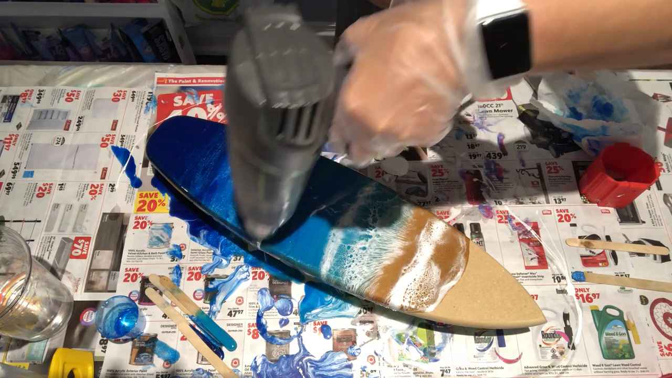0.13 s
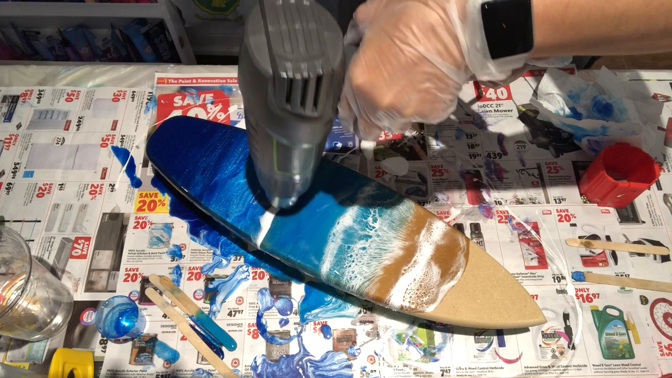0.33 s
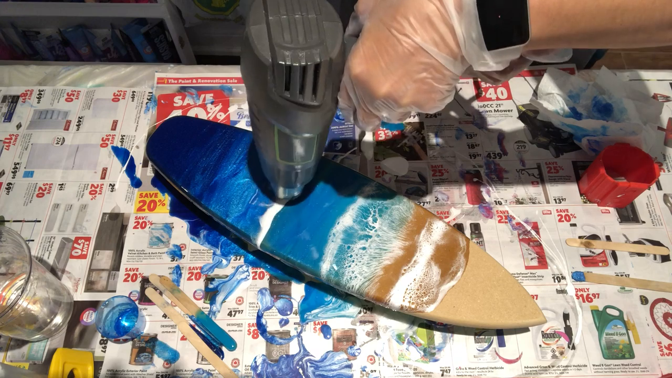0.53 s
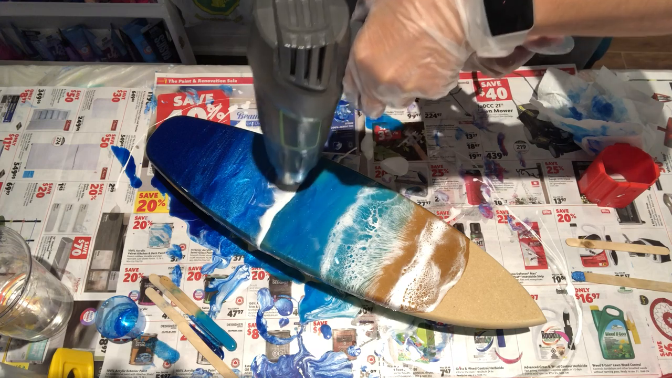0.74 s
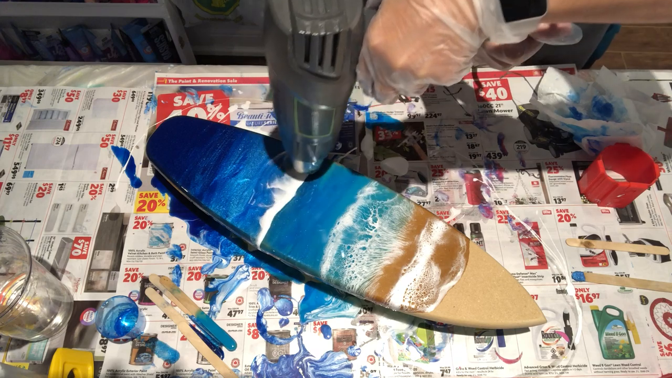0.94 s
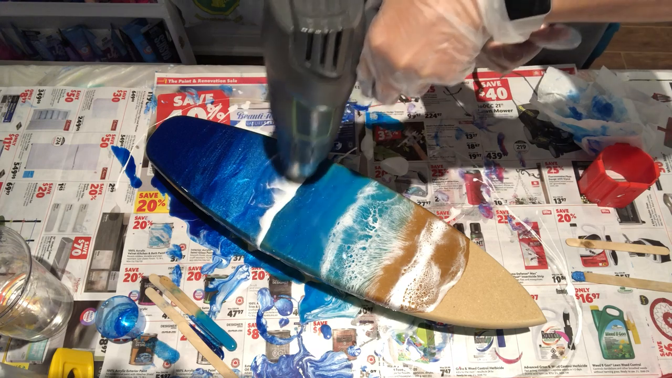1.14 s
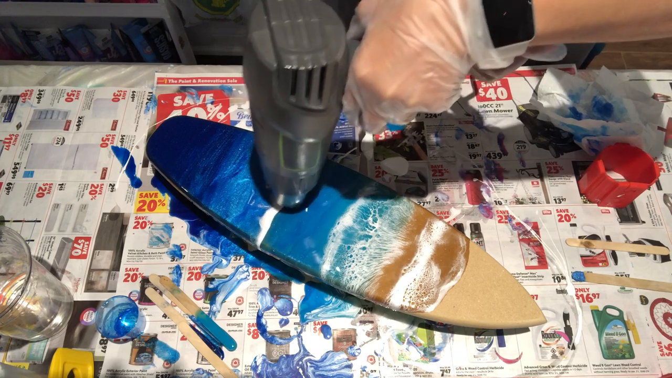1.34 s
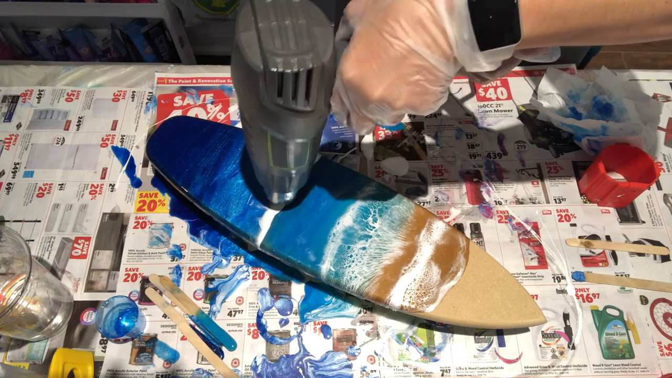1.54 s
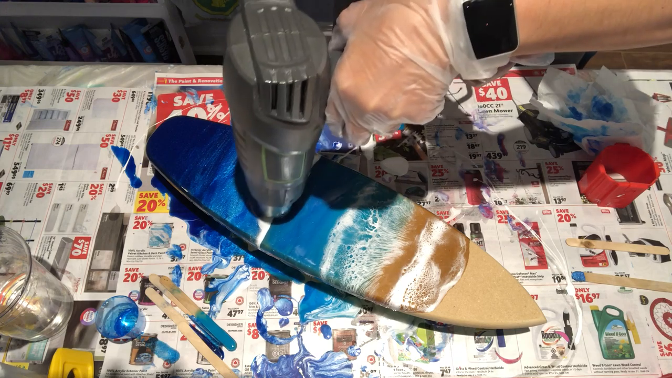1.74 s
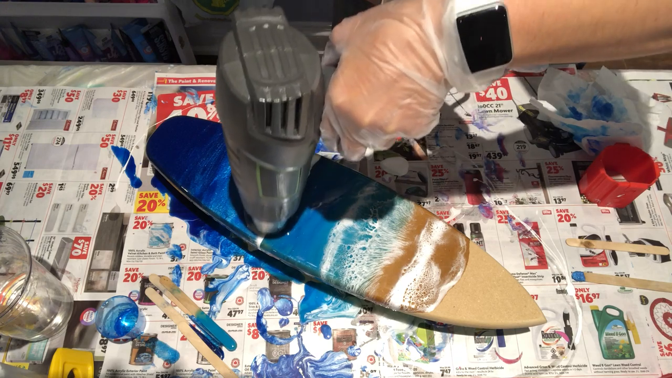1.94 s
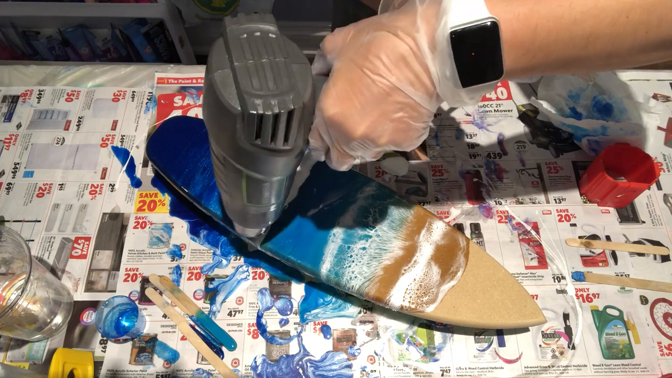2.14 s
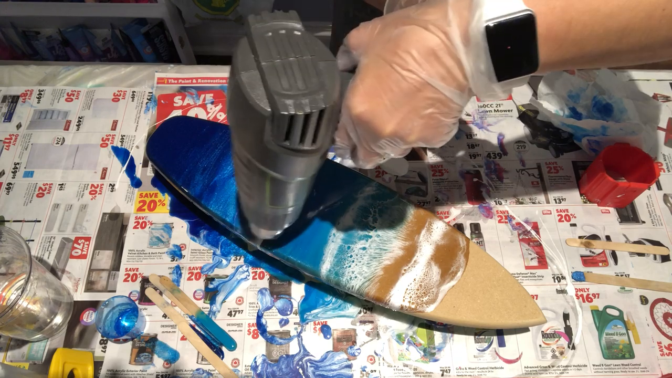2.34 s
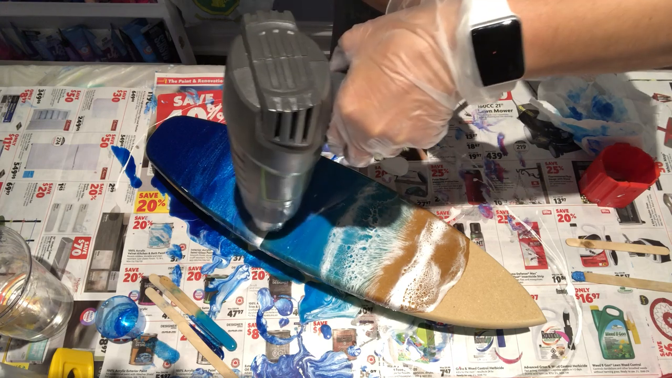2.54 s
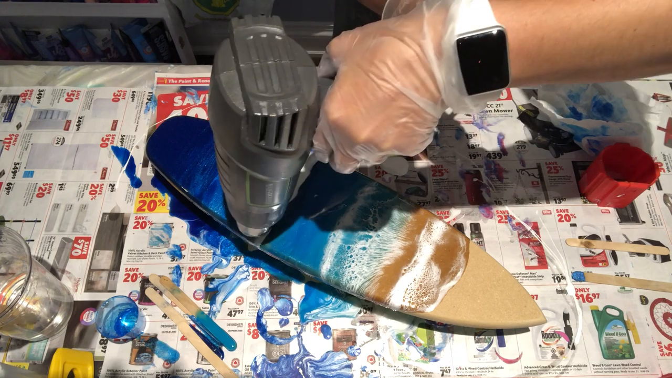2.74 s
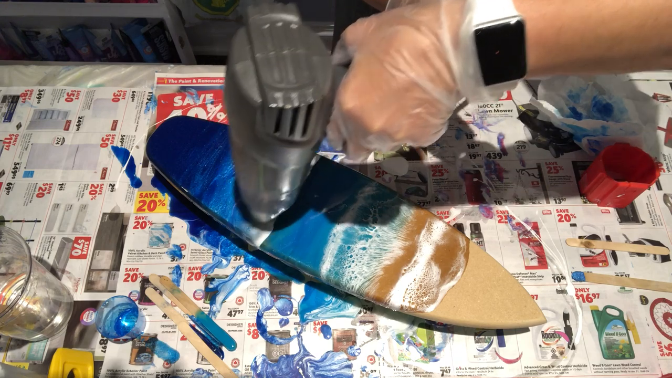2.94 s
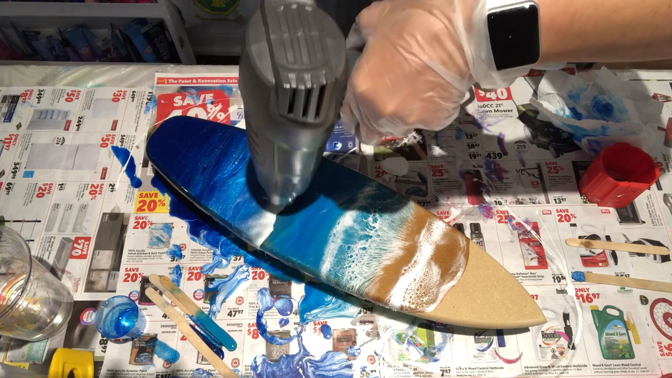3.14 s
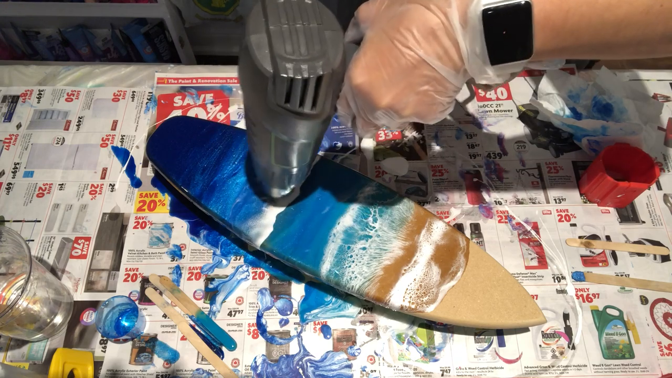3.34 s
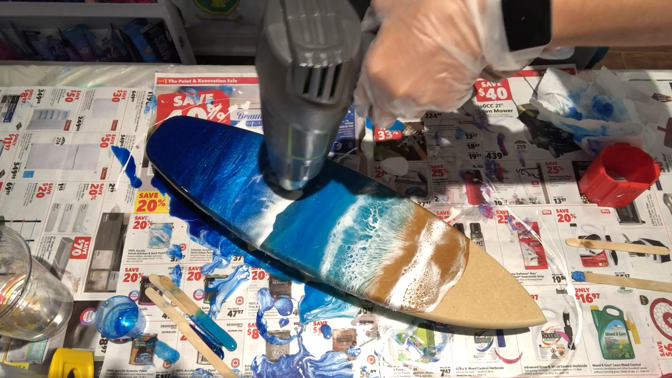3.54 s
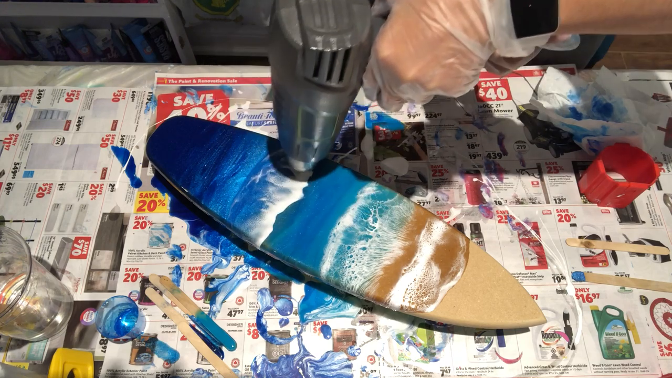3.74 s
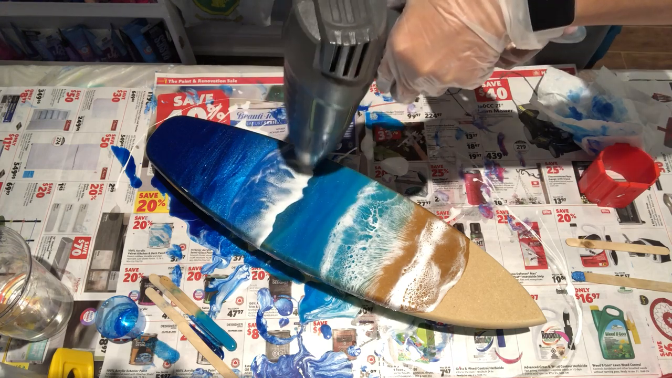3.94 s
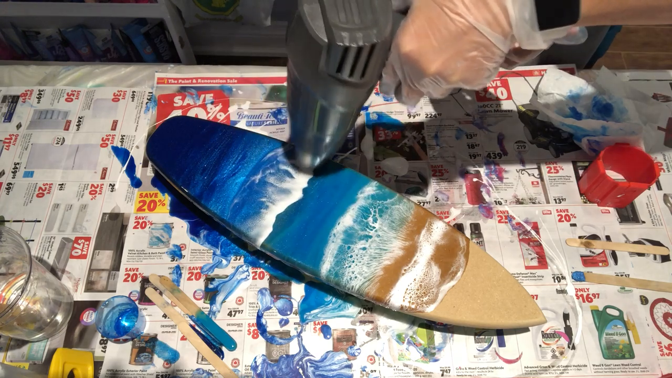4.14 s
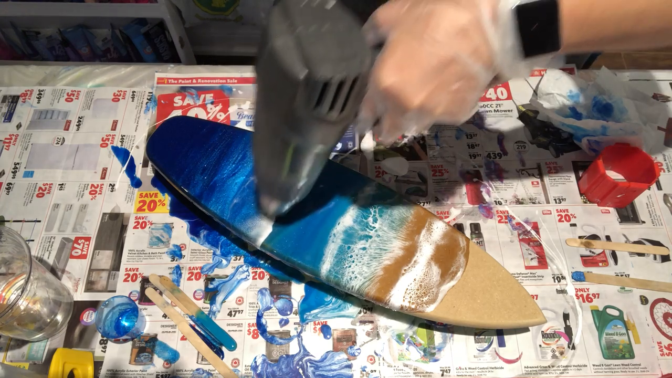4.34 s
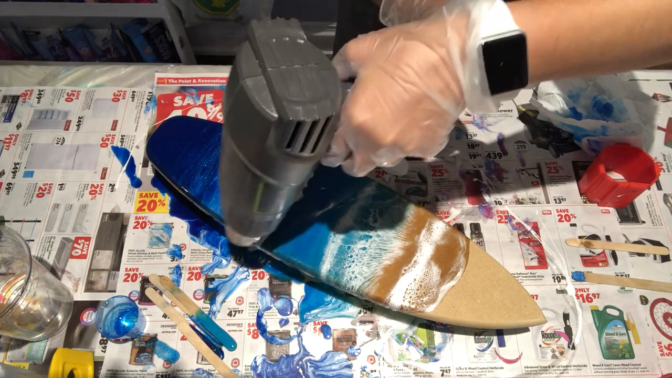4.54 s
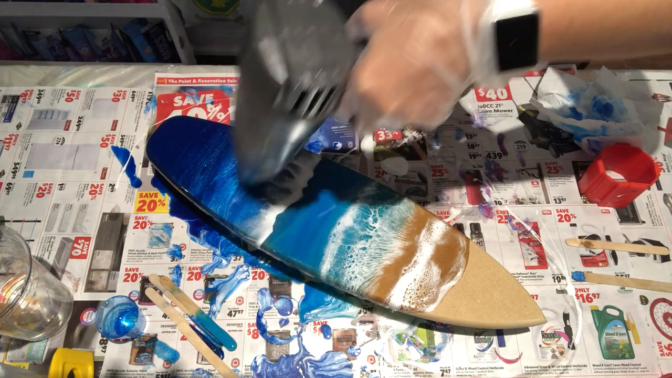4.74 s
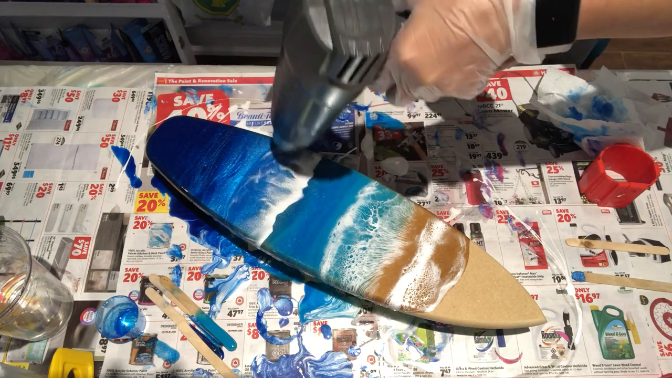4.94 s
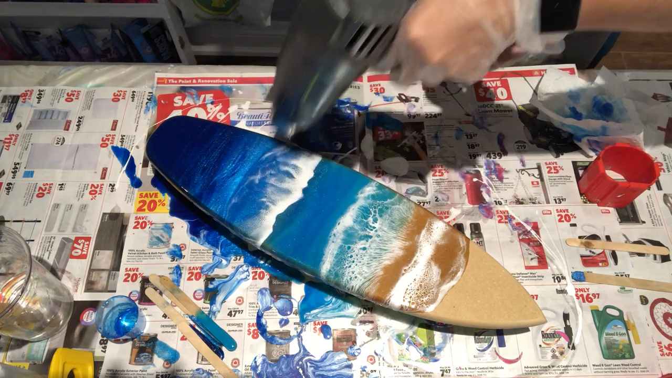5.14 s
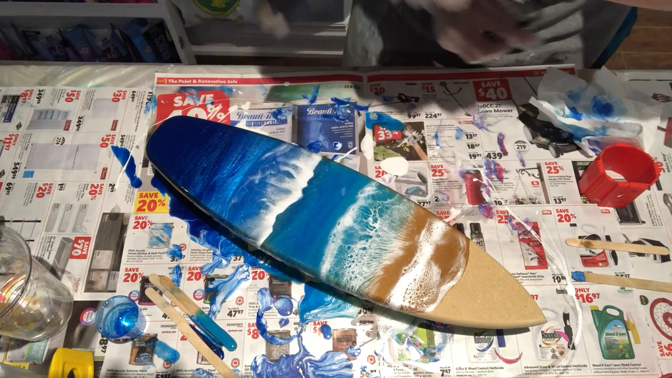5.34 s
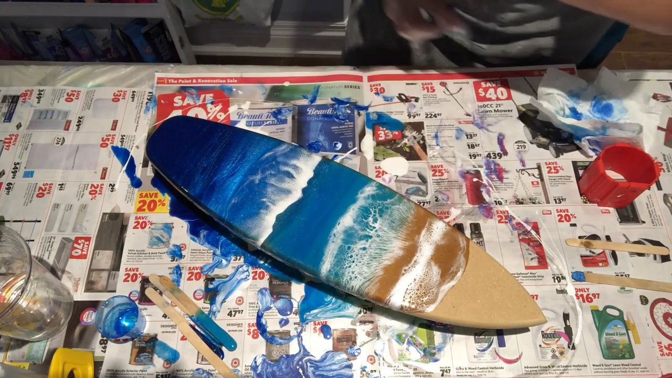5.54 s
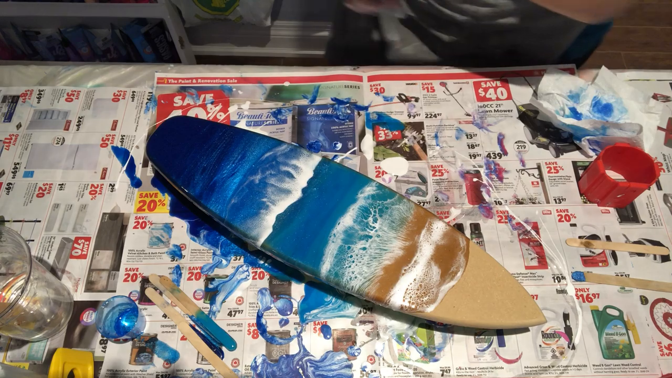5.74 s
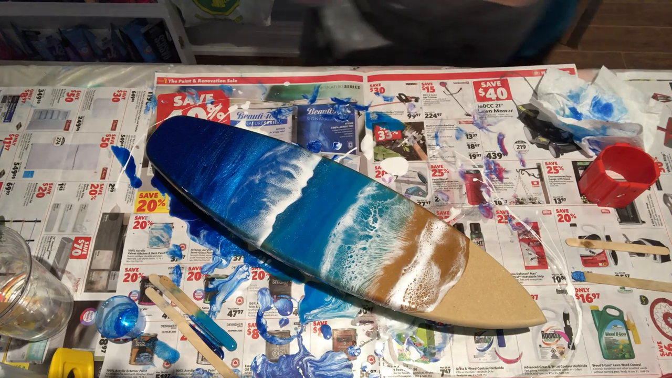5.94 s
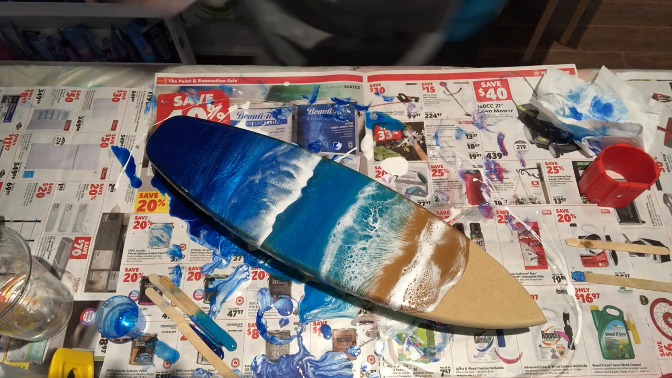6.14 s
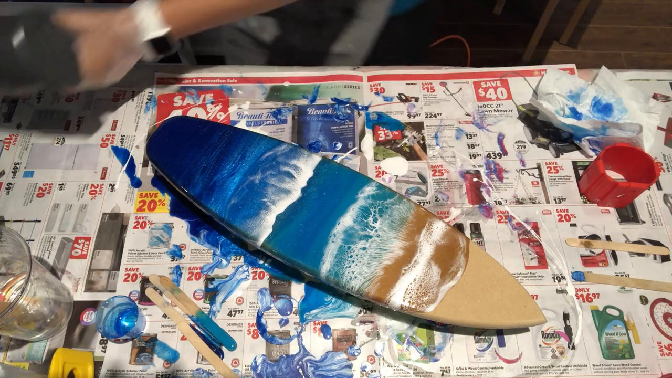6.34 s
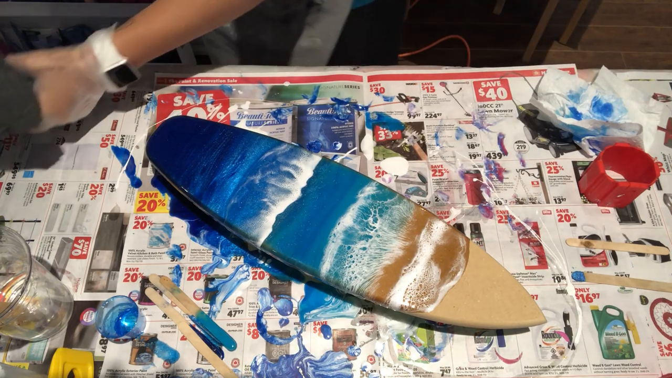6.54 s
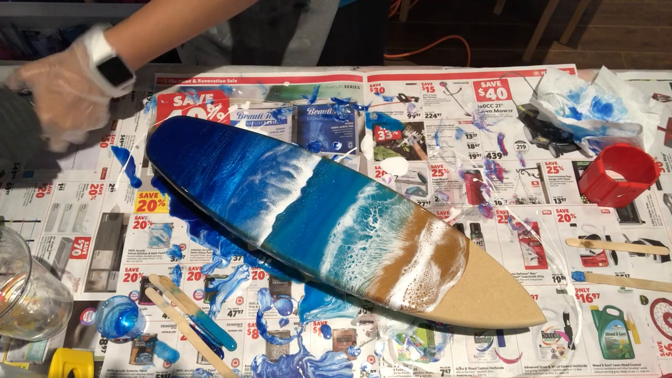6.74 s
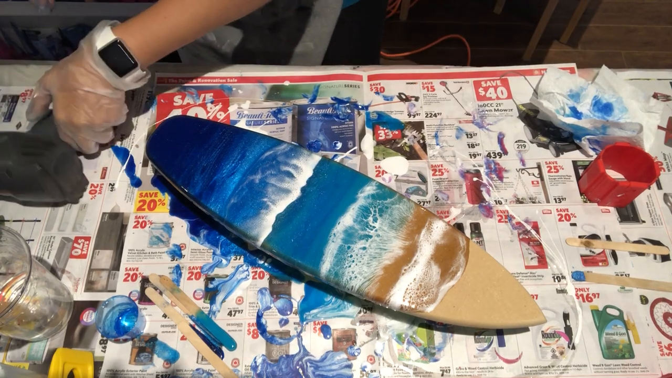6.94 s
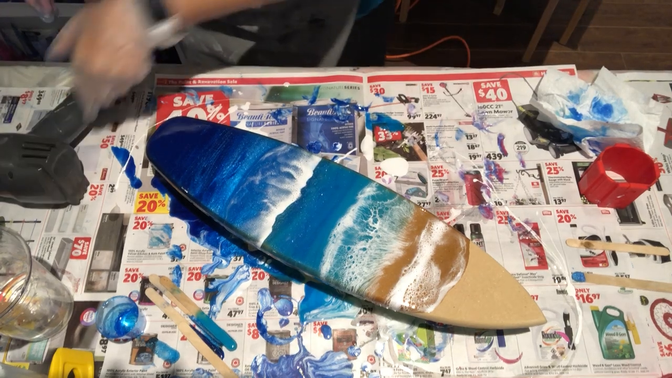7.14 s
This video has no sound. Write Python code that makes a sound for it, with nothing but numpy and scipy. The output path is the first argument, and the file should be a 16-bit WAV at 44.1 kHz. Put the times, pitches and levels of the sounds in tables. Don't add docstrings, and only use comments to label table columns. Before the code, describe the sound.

A handheld hot-air gun roars and whines steadily over a work table, clicks off, winds down in pitch, then is set down with a clattering knock.

```python
import sys
import numpy as np
from scipy import signal
from scipy.fft import rfft, irfft, next_fast_len
from scipy.io import wavfile
from scipy.ndimage import uniform_filter1d, map_coordinates

SR = 44100
rng = np.random.default_rng(int(sys.argv[2]) if len(sys.argv) > 2 else 0)


def magnitude_from_level(level_db):
    exponent = np.asarray(level_db, float) / 20
    return 10 ** exponent


def wrap_up_sound(samples):
    columns = np.atleast_2d(samples).T
    tamed = np.clip(columns, -1, 1)
    steps = np.round(tamed * 32767).astype(np.int16)
    wavfile.write(sys.argv[1], SR, steps)


N = 317079
OFF_S = 5.91


def seconds():
    return np.arange(N) / SR


def in_time(rows):
    s, *columns = np.transpose(rows)
    return [np.interp(seconds(), s, c) for c in columns]


def swell(rows, rise, fall):
    t = seconds()
    levels = []
    for start, db, hold in rows:
        before, after = np.maximum(start - t, 0), np.maximum(t - start - hold, 0)
        levels.append(db - rise * before - fall * after)
    return np.max(levels, axis=0)


def rms_one(x):
    return x / np.sqrt(np.mean(x ** 2) + 1e-20)


def noise():
    return rng.standard_normal(N)


def band(x, low_hz, high_hz):
    return signal.sosfilt(signal.butter(2, [low_hz, high_hz], "band", fs=SR, output="sos"), x)


def narrow_note(breath, hz, width_hz):
    return rms_one(band(breath, hz - width_hz / 2, hz + width_hz / 2))


def drift(rate):
    r = np.exp(-128 * np.pi * rate / SR)
    wander = signal.lfilter([1], [1, -2 * r, r * r], rng.standard_normal(N // 64 + 2001))
    return rms_one(wander[2000:])


def turned_away(t):
    return np.clip((t - 5.07) / 0.71, 0, 1)


def slowing():
    since = np.maximum(seconds() - OFF_S, 0)
    first_sag = 1 - .0657 * (1 - np.exp(-since / .322))
    return np.exp(-since / 0.9005) * first_sag


# t/s, speed/turns per s
ROTOR_SPEED = [(0.0, 234.7), (0.24, 234.1), (0.87, 234.85), (1.3, 234.45), (2.13, 234.7), (2.6, 234.3),
               (4.3, 234.15), (4.46, 234.35), (4.74, 233.65), (5.05, 234.1), (5.42, 233.75), (5.6, 235.0),
               (5.91, 236.4)]


def rotor():
    return np.cumsum(in_time(ROTOR_SPEED)[0] * slowing()) / SR


# t/s, nearness to the work/dB, how far the vents face the listener/dB
HAND_SWEEP = [(0.0, -2, -7), (0.3, 1, -4), (0.55, 1, -3), (0.8, 2, 0), (1.2, 2, -1.5), (1.5, 1.5, 0),
              (2.1, -0.5, -3), (2.75, -1.5, 0), (3.26, 0.5, 3), (3.6, 1.5, 2), (4.0, 0.5, 4),
              (4.3, 2.5, 1.5), (4.55, -2, 5), (4.818, -1, 3), (5.05, 0, 10), (5.3, -4.5, 7.5),
              (5.5, -7.5, 4), (5.9, -9, 4)]
AIR_ZONES_HZ = [300, 760, 960, 1210, 1520, 1920, 2420, 3050, 3840, 4840, 8500]
# change/dB per dB of nearness, per dB of facing, per dB of rotor speed,
# then level/dB once lifted away, level/dB once the brush sparks stop
AIR_FOLLOWS_HAND = [(-0.19, 0.0, 2.1, -3.5, 1.5), (0.32, 0.0, 3, -2, 9), (-0.34, 0.0, 2, -12.5, 1.5),
                    (1.16, 0.0, 2.5, 4.5, -4), (1.26, 0.4, 2, 5, 2.5), (0.1, 0.07, 2, -4, -3.5),
                    (-0.1, -0.05, 3, -4, 3), (0.1, -0.18, 3, 1.5, -1.5), (0.66, -0.14, 3, 4.5, -1),
                    (.5, -0.4, 1.4, 2, -4.5), (0, 0.05, 1.6, 1, -5)]
# f/Hz, level/dB per Hz
AIR_COLOUR = [(50, -101.5), (130, -87.5), (250, -82.5), (480, -81), (650, -86.5), (900, -81.5), (1500, -85),
              (2300, -86), (3300, -92.5), (5000, -92.5), (7000, -99), (14300, -105), (15400, -114),
              (17000, -115)]
# f/Hz, width/Hz, level on top/dB per Hz
BARREL_RESONANCES = [(755.7, 37, -68), (826, 47, -71), (997, 88, -73), (1123, 165, -66), (1380, 260, -80.5),
                     (1803, 310, -79), (1943, 57, -77), (2554, 94, -84), (2883, 195, -78.5),
                     (3826, 510, -84), (4390, 230, -88), (6040, 350, -91)]


def air(turns, shared_db, own_db, quick_db, hiss_db, chop):
    size = next_fast_len(N)
    hz = np.maximum(np.fft.rfftfreq(size, 1 / SR), 1)
    colour_hz, colour_db = np.transpose(AIR_COLOUR)
    power = magnitude_from_level(2 * np.interp(np.log(hz), np.log(colour_hz), colour_db))
    for peak_hz, width_hz, db in BARREL_RESONANCES:
        power += magnitude_from_level(2 * db) / (1 + (2 * (hz - peak_hz) / width_hz) ** 2) ** 1.5
    power /= 1 + (hz / 17600) ** 40
    spectrum = rfft(rng.standard_normal(size)) * np.sqrt(power * SR / 2)

    t, zones = seconds(), np.arange(len(AIR_ZONES_HZ))
    sparks_gone = np.clip((t - OFF_S) / 0.24, 0, 1)
    speed_db = 20 * np.log10(slowing())
    causes = np.array([*in_time(HAND_SWEEP), speed_db, turned_away(t), sparks_gone])
    zone_db = np.array(AIR_FOLLOWS_HAND) @ causes[:, ::64]

    together, out = drift(4.1), np.zeros(N)
    for centre in 30 * 2 ** np.arange(0, 9.4, 1 / 3):
        share = np.cos(np.pi / 2 * np.clip(3 * np.log2(hz / centre), -1, 1)) ** 2
        place = np.interp(np.log(centre), np.log(AIR_ZONES_HZ), zones)
        level = np.interp(zones, place + np.array([-1, 0, 1]), [0, 1, 0]) @ zone_db
        level = level + (shared_db + hiss_db * (centre > 6000)) * together
        level = level + own_db * drift(1.0) + quick_db * drift(1.5)
        gain = np.interp(np.arange(N) / 64, np.arange(len(level)), magnitude_from_level(level))
        piece = irfft(spectrum * share, size)[:N] * gain
        depth = chop * np.clip(np.log2(centre / 3000) / 2, 0, 1)
        out += piece * (1 + depth * (np.cos(2 * np.pi * turns) + 1.2 * np.cos(4 * np.pi * turns)))
    return out


# f/Hz, width/Hz, level/dB,
# change/dB per dB of nearness, change/dB per dB of facing
GAP_RESONANCES = [(1040, 63, -56, 2, -1), (1179.4, 108, -49.5, 0.35, -0.02), (1752, 150, -60, 4.5, .5),
                  (1928, 93, -63, 0.5, 0.2), (2540, 180, -63, 3, 0.6), (4020, 430, -62.5, 1.5, 0.2)]


def gap():
    (near_db, facing_db), breath = in_time(HAND_SWEEP), noise()
    notes = np.zeros(N)
    for hz, width_hz, db, near, facing in GAP_RESONANCES:
        notes += magnitude_from_level(db + near * near_db + facing * facing_db) * narrow_note(breath, hz, width_hz)
    return notes * slowing() ** 2.5


# f/Hz, width/Hz, level/dB
OPEN_RESONANCES = [(817, 88, -9.5), (1212, 170, 0), (1843, 130, -9), (2900, 100, -19), (3930, 130, -22)]
# start t/s, level/dB, hold t/s
OPEN_SINGING = [
    (5.08, -49.5, 0.88),
    (5.3, -41.5, 0.0046),
]


def open_barrel():
    breath = noise()
    notes = sum(magnitude_from_level(db) * narrow_note(breath, hz, width_hz) for hz, width_hz, db in OPEN_RESONANCES)
    return magnitude_from_level(swell(OPEN_SINGING, rise=49, fall=44)) * notes


# multiple, t/s, level/dB
VENT_BEAMS = [(6, 2.5, -6), (6, 5.2, 4), (11, 1.0, 4), (11, 2.8, -4), (11, 3.75, 4), (12, 4.75, -4),
              (15, 5.4, -6), (20, 1.7, -5), (20, 2.7, -6), (20, 4.25, 4), (20, 5.15, 7), (26, .75, -8),
              (28, 1.2, 3), (28, 4.25, -7), (29, 3.8, -9), (29, 4.6, -9), (29, 2.9, 3), (33, 1.0, -5),
              (33, 2.8, 4), (33, 5.0, -5), (34, 2.75, 4), (34, 4.5, -5), (35, 1.0, -5), (35, 2.8, 3),
              (35, 3.75, -5), (35, 5.05, 6), (35, 4.45, 4), (40, 3.95, 5), (40, 5.2, 4), (31, 5.0, 6),
              (50, 4.8, -9), (50, 5.5, -8), (59, 5.4, -5), (60, 2.25, 3), (60, 3.75, 4), (62, .75, -3),
              (62, 3.2, 4), (63, 3.25, 5), (63, 4.6, -4), (27, 5.7, 4), (28, 5.7, 6), (29, 5.55, 7),
              (60, 5.0, -2), (60, .7, -2), (62, 4.9, -2), (40, 4.6, 3), (5, 3.25, 4), (5, 5.25, 3),
              (5, 2.25, -4), (6, 5.75, 4), (11, 5.7, -5), (7, 4.7, -3), (30, 5.75, 7), (31, 5.75, 5),
              (40, 5.75, 5), (41, 5.75, 5), (31, 1.0, -6), (64, 1.0, -8), (20, 5.7, 3)]


def beaming(count):
    s = np.arange(N * 5 // SR + 2) / 5
    gain_db = -4 * np.outer(turned_away(s), np.clip(np.arange(count) / 20, 0, 1))
    for multiple, at_s, db in VENT_BEAMS:
        gain_db[:, multiple - 1] += db * np.exp(-((s - at_s) / .35) ** 2)
    return gain_db


AIMED_FOLLOW = [0.12, 0.09, 0.69]


def turning(turns, orders_db, wander_db, aimed=(), beam_db=0):
    nodes, count = N * 5 // SR + 2, len(orders_db)
    luck = uniform_filter1d(rng.standard_normal((nodes, count)), size=2, axis=0) * np.sqrt(2)
    phase_walk = np.cumsum(.35 * rng.standard_normal((nodes, count)), axis=0)
    phase = rng.uniform(0, 2 * np.pi, count) + phase_walk
    level_db = wander_db * (luck - luck.mean(axis=0)) * np.clip(np.arange(count) / 25, .25, 1)
    facing = np.interp(np.arange(nodes) / 5, *np.transpose(HAND_SWEEP)[[0, 2]])
    for column, multiple in enumerate(aimed):
        level_db[:, multiple - 1] = AIMED_FOLLOW[column] * facing + level_db[:, multiple - 1] / 2
    lines = np.zeros((nodes, 2049), complex)
    lines[:, 1:count + 1] = magnitude_from_level(np.array(orders_db) + level_db + beam_db) * np.exp(1j * phase)
    shapes = irfft(lines, axis=1) * 2048 * np.sqrt(2)
    shapes = np.hstack([shapes, shapes[:, :1]])
    return map_coordinates(shapes, [np.arange(N) * 5 / SR, turns % 1 * 4096], order=1)


WHINE_DB = [-63.5, -60, -82, -82, -54, -61, -53.5, -63, -78, -80, -66, -58, -72, -69, -66, -72, -79, -73,
            -71, -71, -78, -69, -74, -75, -75, -64, -71, -71, -70, -77, -74, -81, -73, -73, -72.5, -79, -78,
            -83, -81, -75, -75, -84, -78, -79, -81, -78, -86, -80, -84, -75, -84, -91, -84, -89, -87, -86,
            -86, -87, -76, -72, -77, -70, -77, -79, -79, -82, -81, -91, -91, -90, -83, -83, -83]
AIMED_MULTIPLES = [7, 12, 26]


def whine(turns):
    t = seconds()
    fade_db = -3.5 * turned_away(t) - 332 * np.maximum(t - OFF_S, 0)
    beam_db = beaming(len(WHINE_DB))
    return turning(turns, WHINE_DB, wander_db=1.6, aimed=AIMED_MULTIPLES, beam_db=beam_db) * magnitude_from_level(fade_db)


RUBBING_DB = [-6, -6, 2, -8, 15, 19, 8, 13, 0, 17, 8, 13, 8, 8, 19, -6, -8, 6, -8, 16, 12, 8, 5, 11, 16, 13,
              11, 8, 9, 15, 11, 8, 7, 4, 3, 2, 9, 8, 4, 10, 18, 14, 5, 8, 3, 8, 8, 2, 6, 4, 14, 9, 2, 2, 10,
              13, 4, 9, 1, 7, 11, 8, 10, 4, 8, 2, 6, 6, 5, -2, 9, -2, 8, 5]
# f/Hz, width/Hz, level/dB, t/s when that side of the shell turns into view
SHELL_RESONANCES = [(670, 130, 0, 5.9), (1165, 190, -1, 5.9), (1850, 260, -2.5, 5.9), (2600, 350, -12, 5.9),
                    (3650, 600, -10, 6), (4670, 550, -13, 5.9), (6150, 650, -2.5, 6.08),
                    (8300, 500, -11, 6.34), (14300, 1100, -20, 5.4)]
# start t/s, level/dB, hold t/s
BRUSH_RUB = [
    (5.95, -64, 0.0),
]


def coasting(turns):
    orders_db = 3 * rng.standard_normal(240)
    orders_db[:len(RUBBING_DB)] = RUBBING_DB
    flutter = magnitude_from_level(2 * np.repeat(drift(25), 64)[:N])
    rub = rms_one(flutter * turning(turns, orders_db, wander_db=1.2) + 4 * noise())
    out = np.zeros(N)
    for k, (hz, width_hz, db, seen_s) in enumerate(SHELL_RESONANCES):
        r = np.exp(-np.pi * width_hz / SR)
        b = (1 - r * r) / 2 * np.array([1, 0, -1])
        a = [1, -2 * r * np.cos(2 * np.pi * hz / SR), r * r]
        ringing = signal.lfilter(b, a, signal.lfilter(b, a, rub))
        out += (-1) ** k * magnitude_from_level(swell([(seen_s, db, 2)], rise=90, fall=0)) * ringing
    return magnitude_from_level(swell(BRUSH_RUB, rise=700, fall=19.7) + 22.0) * out


def strike(times, db, modes, spread_db):
    at, out = np.round(np.array(times) * SR).astype(int), np.zeros(N)
    luck = rng.standard_normal((len(at), len(modes)))
    for k, (hz, mode_db, t60) in enumerate(modes):
        clicks = np.full(N, 1e-18)
        clicks[at] = magnitude_from_level(np.array(db) + mode_db + spread_db * luck[:, k])
        r, w = magnitude_from_level(-60 / (t60 * SR)), 2 * np.pi * hz / SR
        out += signal.lfilter([0, np.sin(w)], [1, -2 * r * np.cos(w), r * r], clicks)
    return out


# t/s, peak level/dB
SWITCH_CONTACTS = [
    (5.9096, -39),
    (5.9104, -33),
    (5.9112, -35),
    (5.914, -40),
    (5.919, -46),
]
# f/Hz, level/dB, time to fall 60 dB t/s
SWITCH_MODES = [(3280, 6, 0.013), (4160, 2.5, .012), (5570, 3, 0.0084), (7200, -6, .005), (8700, -5, .005),
                (10150, -2, 0.0046), (12000, -1, .005), (14500, -9, .004)]


def switch_snap():
    s, db = np.transpose(SWITCH_CONTACTS)
    return band(strike(s, db - 5.5, SWITCH_MODES, spread_db=2), 2500, 13000)


# t/s, blow level/dB, case above the blow level/dB
LANDING_BLOWS = [
    (6.7316, -26, -15),
    (6.7364, -36.5, 8),
    (6.7404, -11.5, -21.5),
    (6.7586, -21.5, -19),
    (6.7640, -23, -11),
]
# t/s, blow level/dB, table top beside the blow level/dB
ROCKING_BLOWS = [(6.7774, -24, -16), (6.7870, -24.5, -18), (6.805, -32, -14), (6.821, -32, -5),
                 (6.838, -39, -16), (6.864, -40, -14), (6.888, -45, -16), (6.976, -36, -5),
                 (6.995, -44, -8), (7.004, -44, -14), (7.016, -39, -20), (7.030, -37, -22),
                 (7.0550, -37, -5), (7.0660, -34, -4.5), (7.0750, -34, -14), (7.086, -41, -4),
                 (7.0915, -27, -10), (7.1140, -38, -13), (7.122, -37, -15), (7.1420, -40, -13),
                 (7.164, -37, -12), (7.1830, -40, -9)]


def blows():
    land_s, land_db, hard_db = np.transpose(LANDING_BLOWS)
    rock_s, rock_db, top_db = np.transpose(ROCKING_BLOWS)
    rock_case_db = rock_db - 24 - 37 * (rock_s - rock_s.mean())
    return np.hstack([[land_s, land_db, land_db - 26, land_db + hard_db],
                      [rock_s, rock_db + top_db, rock_db, rock_case_db]])


# f/Hz, level/dB, time to fall 60 dB t/s
TOP_MODES = [(248, 0, 0.05), (290, 2.5, 0.08), (337, -20, 0.029), (387, -11, 0.024), (434, -14, .06),
             (455, -11, 0.046)]
FRAME_MODES = [(82.6, -21, .12), (105, -3, 0.08), (167, -1.5, 0.11), (199, -11, 0.044)]
CASE_MODES = [(575, -2, 0.065), (790, 1, 0.06), (1113, 1.5, 0.032), (1210, -7, 0.03), (1830, -9, 0.05),
              (2850, -24, 0.03)]


def knocks(s, table_db, frame_db, case_db):
    table = strike(s, table_db - 14, TOP_MODES, spread_db=0.5)
    table = table + strike(s, frame_db - 8, FRAME_MODES, spread_db=1.5)
    table = signal.sosfilt(signal.butter(2, 900, fs=SR, output="sos"), table)
    return table + strike(s, case_db - 10, CASE_MODES, spread_db=3.5)


def ticks(s, case_db):
    bursts = np.full(N, 1e-18)
    bursts[np.round(s * SR).astype(int)] += magnitude_from_level(-39 + 0.49 * case_db)
    decay = magnitude_from_level(-60 / (0.021 * SR))
    return signal.lfilter([1], [1, -decay], bursts) * band(noise(), 1800, 16500)


def crackle():
    strength = magnitude_from_level(4.0 * np.minimum(rng.exponential(1, N), 2))
    return (rng.random(N) < 2500 / SR) * strength * rng.choice([-1, 1], N)


# start t/s, level/dB, hold t/s
PAPER_CRUSH = [
    (6.735, -50.5, 0.0),
    (6.91, -67, 0.0096),
]


def paper(grains, land_s):
    crush = magnitude_from_level(swell(PAPER_CRUSH, rise=280, fall=550))
    unfold = magnitude_from_level(swell([(land_s, -64.5, 0)], rise=5000, fall=35))
    landed = np.arange(N) > (land_s - .001) * SR
    return (crush + unfold) * landed * rms_one(band(grains, 840, 4900))


# start t/s, level/dB, hold t/s
WEIGHT_SHIFTS = [
    (6.8, -34.5, 0.007),
    (6.976, -49, 0.028),
    (7.092, -34.5, 0.0),
    (7.19, -54, 0.0),
]


def groan():
    return magnitude_from_level(swell(WEIGHT_SHIFTS, rise=610, fall=450) - 5.5) * rms_one(band(noise(), 68, 215))


# start t/s, level/dB, hold t/s
SLIDE_HUMS = [
    (6.865, -56.5, 0.054),
    (7.16, -66, .02),
]
SLIDE_SCRAPES = [
    (6.905, -72, 0.011),
    (6.975, -66, 0.0088),
]


def sliding(grains):
    waver = rms_one(band(grains, 9.5, 60)) / 2
    hum = magnitude_from_level(swell(SLIDE_HUMS, rise=600, fall=540)) * np.sin(2 * np.pi * 770 * seconds() + waver)
    rough = rms_one(band(grains, 3470 * .8, 3470 * 1.3))
    return hum + magnitude_from_level(swell(SLIDE_SCRAPES, rise=1900, fall=2000)) * rough


def setting_down():
    s, table_db, frame_db, case_db = blows()
    grains = crackle()
    contact = knocks(s, table_db, frame_db, case_db) + ticks(s, case_db)
    return contact + paper(grains, s[0]) + groan() + sliding(grains)


def room(x):
    t = np.arange(round(.4 * SR)) / SR
    decay = magnitude_from_level(-60 * t / 0.4)
    tail = band(rng.standard_normal(len(t)), 83, 6500) * decay * (t > .005)
    return magnitude_from_level(-14) * signal.fftconvolve(x, tail / np.sqrt(np.sum(tail ** 2)))[:N]


def floor():
    rumble = rms_one(band(noise(), 45, 590))
    return magnitude_from_level(-66.5) * rumble + magnitude_from_level(-72.5) * band(noise(), 30, 19000)


def scene():
    turns = rotor()
    gun = air(turns, shared_db=0.77, own_db=0.5, quick_db=.5, hiss_db=0.8, chop=0.23)
    gun = gun + gap() + open_barrel() + whine(turns) + coasting(turns)
    hits = switch_snap() + setting_down()
    return (gun + hits + room(hits) + floor())[None]


def low_pass(x):
    return signal.sosfilt(signal.butter(12, 17140, fs=SR, output="sos"), x)


def record(dry):
    mix = signal.sosfilt(signal.butter(3, 58, "high", fs=SR, output="sos"), dry)
    return low_pass(mix)


dry = scene()
out = record(dry)
wrap_up_sound(out)
```